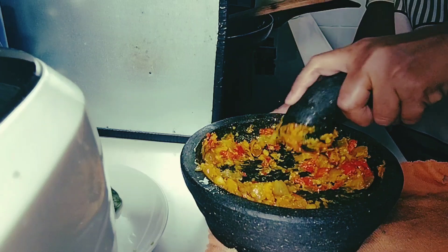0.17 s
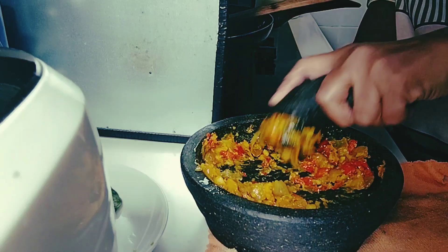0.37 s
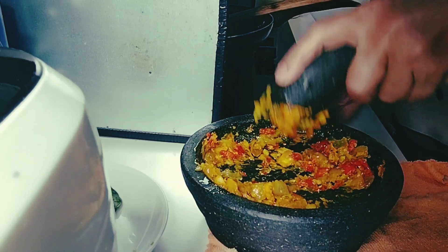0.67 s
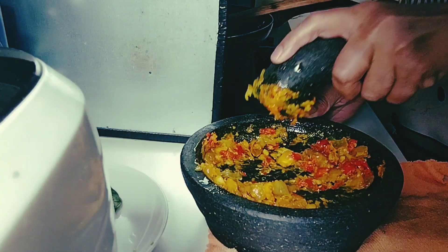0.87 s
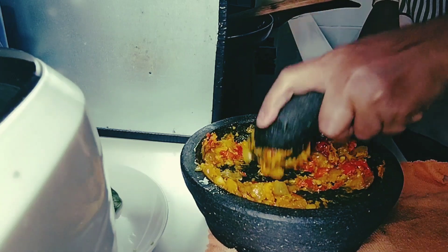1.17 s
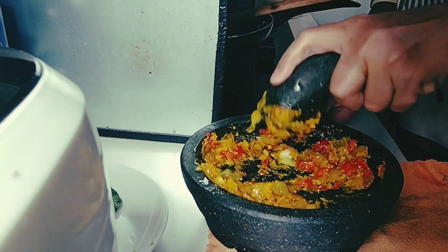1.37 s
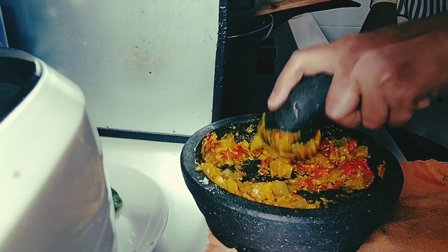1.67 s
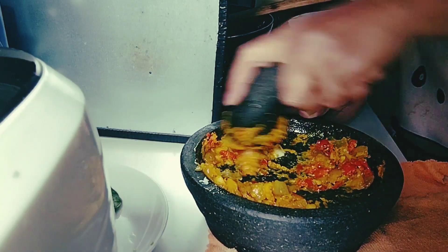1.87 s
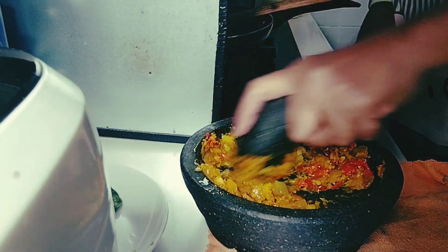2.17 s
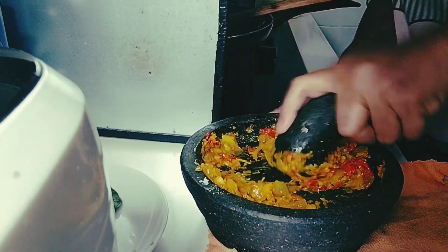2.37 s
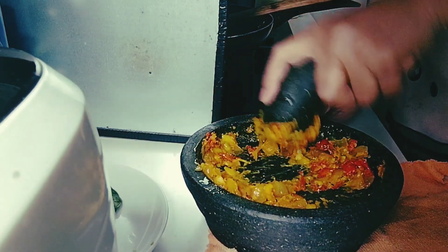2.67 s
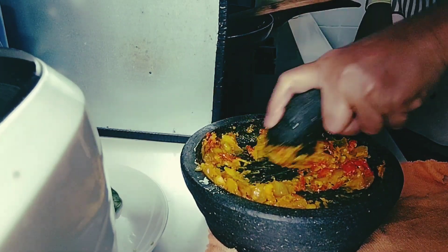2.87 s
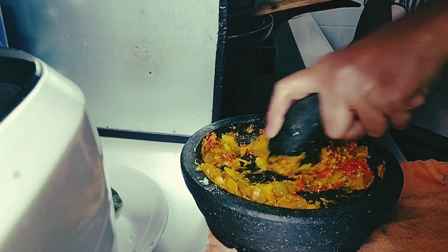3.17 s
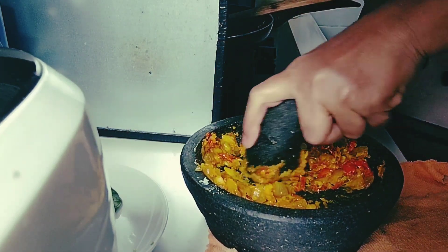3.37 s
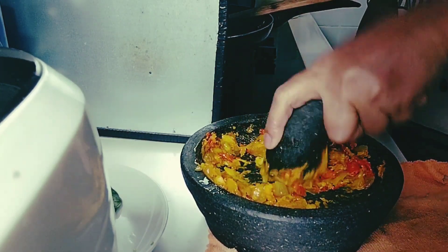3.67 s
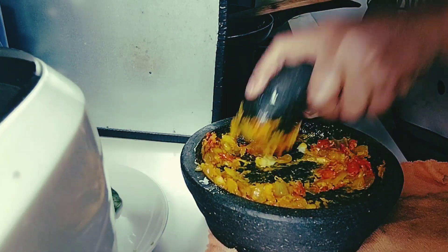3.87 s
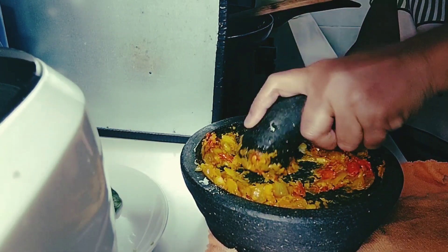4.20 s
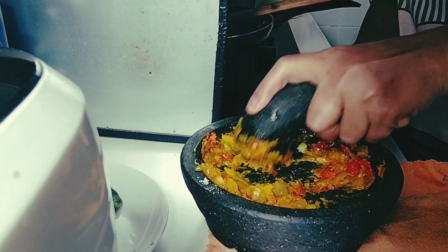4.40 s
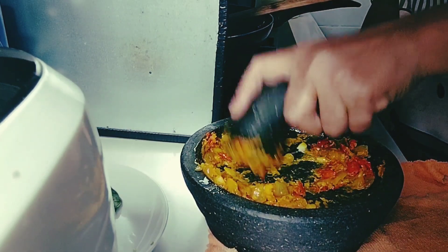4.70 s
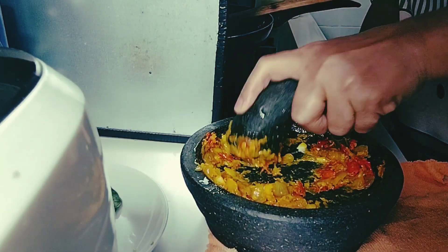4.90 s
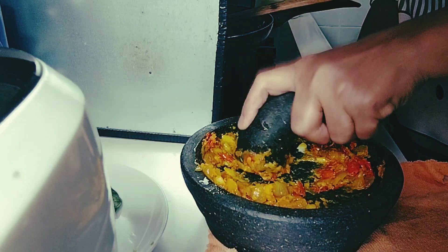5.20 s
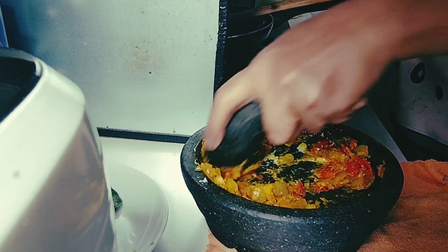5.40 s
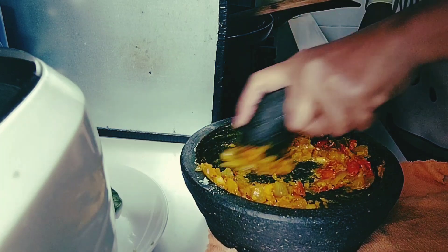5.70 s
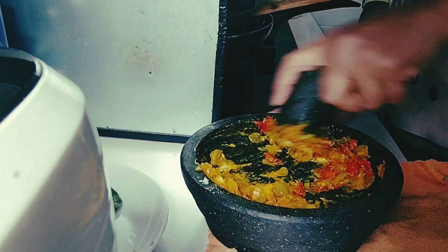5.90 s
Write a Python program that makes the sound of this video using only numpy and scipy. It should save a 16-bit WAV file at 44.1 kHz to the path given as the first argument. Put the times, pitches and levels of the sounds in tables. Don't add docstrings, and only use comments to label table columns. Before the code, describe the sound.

A stone pestle thuds and clacks irregularly in a heavy mortar, squelching and scraping wet paste, over low street hum and distant traffic.

```python
import sys
import numpy as np
from scipy import signal
from scipy.fft import rfft, irfft
from scipy.io import wavfile
from scipy.ndimage import uniform_filter1d

SR = 44100
rng = np.random.default_rng(int(sys.argv[2]) if len(sys.argv) > 2 else 0)


def gain_from_db(level_db):
    decades = np.asarray(level_db, float) / 20
    return 10 ** decades


def to_wav(s):
    ch = np.atleast_2d(s).T
    pcm = np.round(np.clip(ch, -1, 1) * 32767)
    wavfile.write(sys.argv[1], SR, pcm.astype(np.int16))


N = 266804


def evened(x):
    return x / np.sqrt(np.mean(x ** 2) + 1e-20)


def read(points, hz):
    f, value = np.transpose(points)
    return np.interp(np.log(hz + 1), np.log(f + 1), value)


def curve(rows):
    s, db = np.transpose(rows)
    return uniform_filter1d(gain_from_db(np.interp(np.arange(N) / SR, s, db, -150, -150)), 200)


def add(mix, s, sound):
    part = mix[..., round(s * SR):][..., :sound.shape[-1]]
    part += sound[..., :part.shape[-1]]


def ring(modes, detune=0, length=0.54):
    t = np.arange(round(length * SR)) / SR
    return sum(gain_from_db(db - 60 * t / t60) * np.sin(2 * np.pi * hz * (1 + detune) * t)
               for hz, db, t60 in modes)


def noise(colour, patchy_db, likeness, size=512):
    frames, hz = 2 * N // size + 5, np.fft.rfftfreq(size, 1 / SR)
    a, b, c, d, patches = rng.standard_normal((frames, len(hz), 5)).T
    patches = evened(uniform_filter1d(uniform_filter1d(patches, 10, 0), 5, 1))
    same = np.clip(read(likeness, hz), -1, 1)[:, None]
    left = a + 1j * b
    right = same * left + np.sqrt(1 - same ** 2) * (c + 1j * d)
    z = np.array([left, right]) * gain_from_db(read(colour, hz)[:, None] + patchy_db * patches)
    return evened(signal.istft(z, window="cosine", nperseg=size, noverlap=size // 2)[1][:, :N])


def push(ms):
    hump = np.hanning(max(round(ms * SR / 1000), 3) + 2)
    return hump / hump.sum()


def gestures(rows, attack_s, release_s, sag_db):
    level = np.zeros(N)
    for s, length, db in rows:
        t = np.arange(0, length + 8 * release_s, 1 / SR)
        held = np.minimum(t / attack_s, 1) * gain_from_db(db + sag_db * np.minimum(t / length, 1))
        add(level, s, held * np.exp(-np.maximum(t - length, 0) / release_s))
    return level


def tilted(x, db, rad=0):
    half = gain_from_db(db / 2) * np.exp(.5j * rad)
    return irfft(rfft(x) * np.array([half, 1 / half]), N)


# (frequency [Hz], density [dB per Hz])
HUM_COLOUR = [(29, -55), (50, 0), (99, 5), (220, -2), (366, 1), (609, -13), (739, -9), (1140, -15),
              (2490, -19), (4500, -40), (6850, -34), (7200, -43), (12500, -36.5), (16500, -37)]
# (frequency [Hz], density [dB per Hz])
TRAFFIC_COLOUR = [(290, -15), (500, 3.5), (795, 4.5), (946, 5), (1340, -6.5), (2070, -6.5), (3060, -4),
                  (3810, -10), (4470, -11), (6230, -13.5), (8210, -21), (16000, -30)]
# (time [s], level [dB])
TRAFFIC_LEVEL = [
    (0.0, -55),
    (0.85, -55.5),
    (1.4, -62),
    (1.95, -52.5),
    (2.85, -60),
    (3.3, -48.5),
    (6.05, -48),
]
# (frequency [Hz], left-right likeness [0..1])
DIFFUSE = [(100, 0.97), (250, 0.71), (500, 0.33), (1000, 0.011)]


def street():
    hum = gain_from_db(-46) * noise(HUM_COLOUR, 0.84, DIFFUSE, size=2048)
    return hum + curve(TRAFFIC_LEVEL) * noise(TRAFFIC_COLOUR, 1.66, DIFFUSE)


# (frequency [Hz], bandwidth [Hz], level [dB])
COVERS = [(2080, 110, -2), (3130, 220, 0), (4480, 140, 0), (5000, 250, -5), (7600, 350, -6),
          (8500, 450, -7), (10100, 500, -12)]
# (time [s], firings [per s])
FIRING_RATE = [
    (3.145, 20.43),
    (3.6, 20.36),
    (4.15, 18.86),
    (4.6, 19.65),
    (6.05, 20.39),
]
# (time [s], level [dB])
ENGINE_LEVEL = [
    (3.1, -68),
    (3.65, -56),
    (4.0, -62),
    (4.3, -57),
    (5.0, -60.5),
    (6.05, -56),
]


def engine():
    buzz_db, rasp_db = -14, 1
    s, rate = np.transpose(FIRING_RATE)
    clock = np.arange(s[0], s[-1], 1 / SR)
    fired = np.cumsum(np.interp(clock, s, rate)) / SR
    times = np.interp(np.arange(int(fired[-1]) + 1), fired, clock)
    chance = rng.standard_normal((len(times), len(COVERS), 5))
    rasp, shake = np.zeros((2, N)), rng.standard_normal((2, N))
    t = np.arange(1300) / SR
    pulse = t / .004 * np.exp(1 - t / .004)
    for k, (hz, width, db) in enumerate(COVERS):
        gate = np.full(N, gain_from_db(db + buzz_db))
        for at, (late, loud, off, *phase) in zip(times, chance[:, k]):
            tone = np.sin(2 * np.pi * ((hz + .6 * width * off) * t + np.c_[phase]))
            start = at - .003 + .0012 * late
            burst = gain_from_db(db + 2.5 * loud) * pulse
            add(rasp, start, burst * tone)
            add(gate, start - .001, gain_from_db(rasp_db) * burst)
        cover = np.exp(-np.pi * width * t) * np.sin(2 * np.pi * hz * t)
        cover /= np.linalg.norm(cover)
        rasp += signal.oaconvolve(gate * shake, cover[None], axes=1)[:, :N]
    return evened(rasp + 0.089 * rasp[::-1]) * curve(ENGINE_LEVEL)


# (frequency [Hz], decay time T60 [s])
ROOM = [(100, 0.58), (500, 0.35), (1000, 0.2), (2000, 0.21), (6000, 0.16), (16000, 0.05)]


def kitchen(x):
    taps = np.zeros((2, SR // 2))
    at = np.arange(200, SR // 2 - 20, 20)
    at = at + rng.integers(0, 20, (2, (SR // 2 - 201) // 20))
    np.put_along_axis(taps, at, rng.choice([-1., 1.], at.shape), 1)
    hz, t, z = signal.stft(taps, SR, nperseg=256)
    absorbed = read([(150, -20.0), (600, 4)], hz)[:, None]
    z *= gain_from_db(-60 * t / read(ROOM, hz)[:, None] + absorbed)
    tail = signal.istft(z, SR, nperseg=256)[1]
    return signal.fftconvolve(x[None], tail / np.linalg.norm(tail[0]), axes=1)[:, :N]


# (frequency [Hz], left minus right [dB], left lead [rad])
LEAN = [(120, 0, 0), (165, 2, -.15), (330, -4.5, -.45), (520, -6, -1), (820, -1, 2.2), (1200, 2, -.3),
        (2000, 1.5, -.4)]


def ports(x):
    hz, rows = np.fft.rfftfreq(N, 1 / SR), np.array(LEAN)
    return tilted(x, read(rows[:, :2], hz), read(rows[:, ::2], hz))


# (frequency [Hz], left-right likeness [0..1])
APART = [(300, 1), (1000, 0.06)]


def spatter(colour, size=512):
    return noise(colour, 2.6, APART, size)


# (frequency [Hz], level [dB], T60 [s])
COUNTER_LOW = [(82.8, -19, 0.35), (126.9, -5.5, 0.27)]
# (frequency [Hz], level [dB], T60 [s])
COUNTER_HIGH = [(158.2, 3, 0.2), (193.8, -18.5, 0.62)]


def counter(low_db, high_db, low_detune=0, high_detune=0):
    return gain_from_db(low_db) * ring(COUNTER_LOW, low_detune) + gain_from_db(high_db) * ring(COUNTER_HIGH, high_detune)


# (frequency [Hz], level [dB], T60 [s])
BOWL = [(288.2, -11.5, 0.15), (352.6, 0.5, 0.027), (419.4, -15.5, 0.073), (562, -9, 0.05),
        (306.4, -24, 0.41), (370, -29, 0.51), (251, -31, 0.68)]


def bowl(detune=0):
    return ring(BOWL, detune)


# (frequency [Hz], level [dB], T60 [s])
STONE = [(810, -11, .04), (1270, 0, .018), (1400, -8, .02), (1680, -9, .02), (1525, -3, .022),
         (1890, -5, .022), (2060, -8, .022), (2430, -6, .02), (2600, -6, .02), (2950, -13, .015),
         (3300, -15, .015)]


def clack(detune):
    above = signal.butter(N=2, Wn=1050, btype="high", fs=SR, output="sos")
    return signal.sosfilt(above, ring(STONE, detune, .08))


# (start [s], length [s], paste hiss [dB], drag [dB])
STROKES = [(0.01, 0.026, -61, -67), (0.19, 0.056, -62.5, -47), (0.277, 0.095, -62, -51),
           (1.802, 0.039, -45.5, -57), (1.877, 0.094, -47, -52), (2.0, 0.072, -47.5, -49),
           (2.13, .09, -46.5, -46.5), (2.279, 0.14, -49.5, -45.5), (2.628, 0.083, -56, -53),
           (2.74, 0.042, -47.5, -57), (2.817, 0.12, -47, -46.5), (2.98, 0.055, -45.5, -41.5),
           (3.103, 0.11, -49, -38.5), (3.269, 0.11, -48, -44.5), (3.437, 0.13, -52.5, -54),
           (5.273, 0.043, -53, -48), (5.31, 0.19, -49, -49.5), (5.506, .14, -47.5, -44.5),
           (5.665, 0.094, -64, -50), (5.774, 0.17, -49, -38), (5.985, .05, -50, -54)]
# (frequency [Hz], density [dB per Hz])
HISS = [(1180, -28), (2000, -7), (2410, -15), (3430, -8.5), (6250, -7), (7720, -9), (12100, -4),
        (15600, -12.5), (16100, 2), (16500, -37)]


def fizz():
    pops = gain_from_db(2.8 * np.minimum(rng.exponential(1, N // 60 + 1), 4)).repeat(60)[:N]
    popping = evened(spatter(HISS) * uniform_filter1d(pops, 40))
    return popping * gestures(np.array(STROKES)[:, :3], attack_s=0.019, release_s=0.027, sag_db=-2.5)


def drag():
    linger_s = 0.045
    body = counter(0, -9.0) + gain_from_db(-5.5) * bowl()
    pressure = gestures(np.delete(STROKES, obj=2, axis=1), linger_s, linger_s, 0)
    return evened(signal.oaconvolve(rng.standard_normal(N), body)[:N]) * pressure


# (start [s], length [s], through paste [dB], bare stone [dB])
SCRAPES = [(1.938, 0.028, -50.5, -61), (1.995, 0.044, -53, -68), (2.309, 0.024, -55.5, -69),
           (3.035, 0.014, -45.5, -62), (3.111, 0.011, -45, -56), (3.163, 0.052, -47, -57),
           (3.284, 0.03, -48.5, -60), (3.326, 0.022, -45.5, -60), (3.354, .015, -50, -58),
           (3.47, 0.022, -55, -62), (5.317, 0.016, -44, -40), (5.58, .05, -49.5, -45),
           (5.786, .012, -59, -50), (5.845, 0.022, -43.5, -54), (5.889, 0.035, -43, -50)]


def grating():
    edge_s, cushion_ms = 0.0026, 0.43
    scrapes = np.array(SCRAPES)
    grit = rng.standard_normal(N) * gain_from_db(2.0 * rng.exponential(1, N))
    grit *= rng.random(N) < 4000 / SR
    grit[(SR * (scrapes[:, 0] + .004)).astype(int)] = 4
    bare = clack(0)
    cushioned = np.convolve(bare, push(cushion_ms))
    contacts = (cushioned, scrapes[:, :3]), (bare, np.delete(scrapes, obj=2, axis=1))
    return sum(evened(signal.oaconvolve(grit, stone)[:N]) * gestures(catches, edge_s, edge_s, 0)
               for stone, catches in contacts)


# (frequency [Hz], density [dB per Hz])
SPRAY_COLOUR = [(350, -71), (600, -26), (948, -13.5), (1900, -12), (2800, -12), (5220, -7), (7590, -10.5),
                (12200, -5.5), (15800, -11), (16500, -39)]
# (time [s], level [dB], dull slap of thick paste [dB])
SQUIRTS = [(0.028, -52, -9), (0.243, -51, -9), (0.287, -53, -9), (0.3117, -45, 0), (0.9226, -10.5, 0),
           (1.3119, -15, 0), (1.5828, -17.5, -1), (1.816, -39, 7), (1.8746, -35.5, -6), (2.144, -32.5, -7),
           (2.283, -49, -5), (2.577, -19.5, -6), (2.756, -40, -7), (3.503, -38, -6), (3.563, -38, -6),
           (3.7964, -20, 1.5), (4.07, -17.5, 8), (4.366, -29, 2), (4.6074, -31.5, -1), (4.8442, -24.5, -6),
           (5.0778, -17, 5), (5.3956, -34, -5), (5.455, -45, -6), (5.5363, -49, -5), (5.812, -33.5, -3),
           (6.0072, -31, -5)]


def splats():
    rise_ms, squirt_t60, trickle_db, trickle_t60 = 1.15, 0.043, -16, 0.24
    level, t = np.zeros((2, 1, N)), np.arange(SR // 4) / SR
    decay = gain_from_db(-60 * t / squirt_t60) + gain_from_db(trickle_db - 60 * t / trickle_t60)
    burst = (1 - np.exp(-1000 * t / rise_ms)) ** 2 * decay
    for s, db, slap_db in SQUIRTS:
        gains = gain_from_db([db - 4, db - 3.5 + slap_db])[:, None, None]
        add(level, s - .0015, gains * burst)
    spray = spatter(SPRAY_COLOUR, size=256)
    slap = signal.sosfiltfilt(signal.butter(N=2, Wn=2600, fs=SR, output="sos"), spray)
    return level[0] * (spray - slap) + level[1] * slap


def strike(s, high_db, low_db, bowl_db, stone_db):
    u = rng.uniform(-1, 1, 8)
    ms = np.clip(3.47 + 0.32 * (low_db - bowl_db), 2, 6)
    boom = counter(low_db + 3.0, high_db + 1.5, 0.02 * u[0], 0.069 * u[1])
    knock = gain_from_db(bowl_db + 3) * np.convolve(bowl(0.043 * u[2]), push(0.63 * ms))
    parts = [(s - .0015, -np.convolve(boom, push(ms))),
             (s + 0.00079, gain_from_db(-4.5) * knock),
             (s + 0.00332, knock)]
    for k, chance in enumerate(u[3:]):
        tap = np.convolve(clack(.015 * chance), push(.2 + .09 * k))
        tap_db = stone_db - 3.0 - 2.0 * k + 5.8 * chance
        parts.append((s + 0.000947 + .0015 * (k + .6 * chance), -gain_from_db(tap_db) * tap))
    return parts


# (time [s], counter thud [dB], bowl knock [dB])
BUMPS = [(0.309, -40, -68), (1.828, -30.5, -58), (1.943, -29.5, -57), (2.049, -36, -33.5),
         (2.827, -49, -40), (3.336, -42, -39), (5.319, -34, -34.5), (5.582, -44, -38), (5.787, -35, -37.5),
         (5.843, -53, -34.5), (5.953, -37.5, -34)]


def bumps():
    solid = np.zeros(N)
    for s, thud_db, bowl_db in BUMPS:
        for at, sound in strike(s, thud_db - 6, thud_db, bowl_db, stone_db=-55):
            add(solid, at, sound)
    return solid


# (time [s], upper counter [dB], lower counter [dB], bowl knock [dB], stone clack [dB])
BLOWS = [
    (0.9225, -14, -15, -14, -34.5),
    (1.318, -22, -20, -12, -32.5),
    (1.584, -23, -18, -19.5, -58),
    (2.579, -20.5, -10.5, -17, -70),
    (3.799, -17.5, -11.5, -12, -30),
    (4.07, -21, -15, -9.5, -9),
    (4.364, -25.5, -19, -20.5, -40),
    (4.608, -21, -14.5, -29, -60),
    (4.845, -22, -15, -15, -33.5),
    (5.077, -20.5, -14, -12, -19.5),
]


def pestle():
    solid = np.zeros(N)
    for blow in BLOWS:
        for at, sound in strike(*blow):
            add(solid, at, sound)
    return solid


def scene():
    near = pestle() + bumps() + grating() + drag()
    wet = splats() + fizz()
    ticks = engine()
    echoes = kitchen(gain_from_db(-9.5) * near + gain_from_db(-13.5) * wet[0] + gain_from_db(-3) * ticks[0])
    return ports(near) + wet + echoes + street() + ticks


# (frequency [Hz], left minus right [dB])
PORT_COLOUR = [(3000, 0), (5500, 3), (6500, 1.5), (8500, 8.5), (10500, -4), (12500, -1), (15500, 4.5)]


def microphones(x):
    coloured = tilted(x, read(PORT_COLOUR, np.fft.rfftfreq(N, 1 / SR)))
    no_bass = signal.butter(N=3, Wn=85, btype="high", fs=SR, output="sos")
    heard = signal.sosfilt(no_bass, coloured)
    edge = signal.firwin(301, 15950, window=("kaiser", 7), fs=SR)
    return signal.oaconvolve(1.1 * np.tanh(heard / 1.1), edge[None], "same")


def band_limit(x):
    return signal.sosfilt(signal.butter(12, 16970, fs=SR, output="sos"), x)


def record(dry):
    mix = microphones(dry)
    return band_limit(mix)


dry = scene()
out = record(dry)
to_wav(out)
```